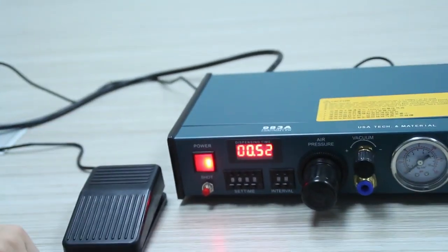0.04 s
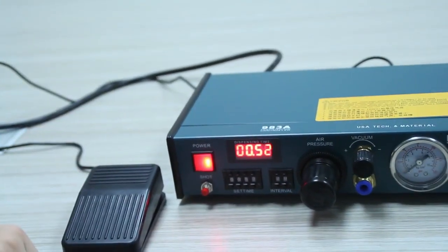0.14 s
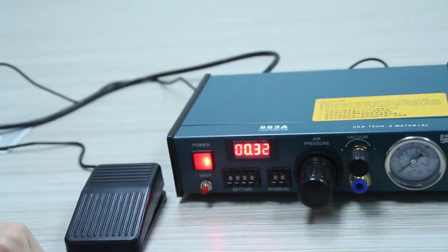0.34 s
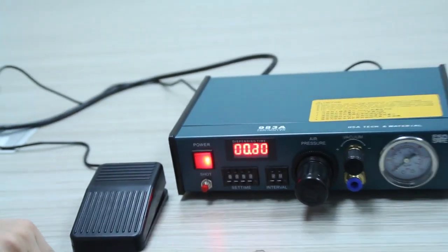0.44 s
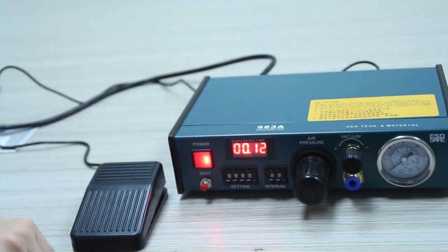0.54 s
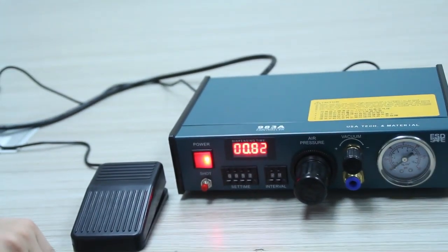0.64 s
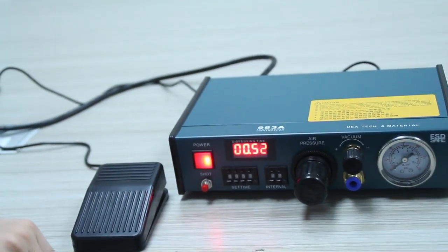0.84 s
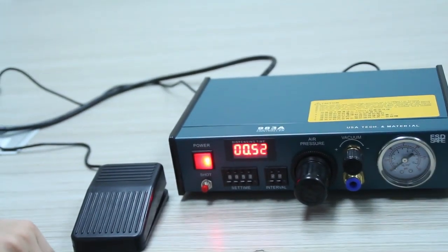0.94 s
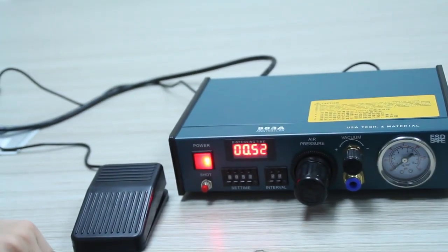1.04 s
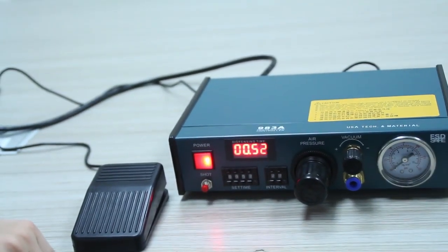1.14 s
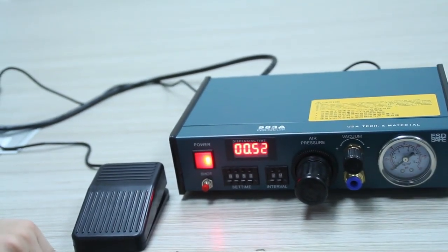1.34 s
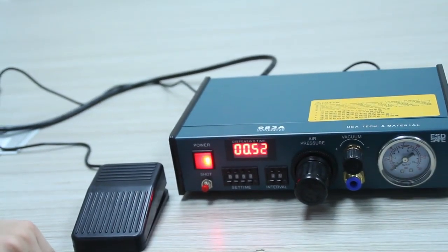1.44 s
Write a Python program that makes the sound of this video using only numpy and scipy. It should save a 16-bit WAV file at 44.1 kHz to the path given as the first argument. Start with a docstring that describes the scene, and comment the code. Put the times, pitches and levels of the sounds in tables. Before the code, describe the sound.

A pneumatic dispenser valve clicks open and shut once, with a short puff of air.

```python
"""Air valve in a metal box

A solenoid valve snaps open with a pop and a rush of air, then drops shut half a second later
with ticks and a rattle. Each stroke of its plunger makes the sheet-metal box boom in close
tones that beat against each other. A quiet room echoes and hums behind."""
import sys
import numpy as np
from scipy import signal
from scipy.io import wavfile
from scipy.ndimage import uniform_filter1d

SR = 44100
rng = np.random.default_rng(int(sys.argv[2]) if len(sys.argv) > 2 else 0)


def put_to_file(sound):
    """Save the sound as 16-bit audio at rate SR, in the file named by the first command-line argument."""
    columns = np.atleast_2d(sound).T  # one column per channel
    safe = np.clip(columns, -1, 1)
    whole_steps = np.round(safe * 32767)
    wavfile.write(sys.argv[1], SR, whole_steps.astype(np.int16))


N = 66150

# A fade is the time to drop 60 dB. A positive tilt favours the high tones.
# plunger strokes that shake the box (time [s], level [dB], tilt [dB/octave])
STROKES = [(.2111, -17.8, -1.6), (.7447, -16.5, 1.6)]
# ringing tones of the box panels (pitch [Hz], level [dB], fade [s], sign [+1 or -1])
BOX_TONES = [(253.4, -10, .13, 1), (288.5, -4.7, .21, 1), (302.4, -14, .8, 1), (319.7, 0, .31, 1),
             (329.3, -2.1, .3, -1), (340.2, -9.6, .61, 1), (360.1, -2.8, .33, -1), (366, -8.4, .53, 1),
             (386.7, -4.5, .42, -1)]
# the plunger hits its end stop on opening (time [s], level [dB], tilt [dB/octave])
LANDINGS = [(.2120, -26.5, 1.5)]
# tones of the end stop (pitch [Hz], level [dB], fade [s])
STOP_TONES = [(520, -8.5, .04), (610, -18, .04), (774, -8.5, 0.035), (900, -11.5, .04), (1064, -2, .06),
              (1190, -6.5, 0.0399), (1985, 1, .02), (2120, -3, .02), (2360, -7.5, 0.032), (2690, 2.5, .021),
              (3610, -8.5, 0.026), (4063, -3.5, 0.0406), (4650, -15.5, .015), (5900, -8.5, .03),
              (5760, -13.5, 0.0189), (8400, -9, .02), (9120, -17, .016)]
# ticks as the valve closes (time [s], level [dB], tilt [dB/octave])
TICKS = [(.7382, -26, 0), (.7422, -36.5, -9.5), (.7452, -50, -9.5)]
# tones of the valve body (pitch [Hz], level [dB], fade [s])
VALVE_TONES = [(690, -19, .04), (975, -20, .04), (1250, -23, .04), (1630, -12, .08), (1905, -12, .04),
               (2470, -11, .06), (2780, -8, .03), (2960, -16, .06), (3180, -11, .03), (3412, -11, .17),
               (3450, -2, .02), (4035, -14, .05), (4400, -16, .02), (4900, -19, .03), (8300, -16, .03),
               (8900, -20, .03)]
# air snaps on opening (time [s], level [dB], fade [s], tilt [dB/octave])
SNAPS = [(0.2096, -26, 0.03, 1), (0.216, -40, 0.059, -1.5), (0.224, -27, 0.089, -1)]
# faint puffs while the valve is open (time [s], level [dB], centre [Hz], width [Hz])
PUFFS = [(0.406, -52, 1190, 400), (0.492, -53, 3000, 2000)]
# the colour of each noise, from bass to treble (frequency [Hz], relative level [dB])
SNAP_COLOUR = [(290, -35.5), (500, -8.5), (1100, 0.5), (1500, -10), (2060, 8), (2500, -1), (2750, 4.5),
               (2950, -14), (3450, 6.5), (3750, -4), (4140, 7.5), (5000, 1.5), (5700, 9), (6200, -0.5),
               (6550, -23.5), (7600, -13), (8400, 12.5), (9360, 18.5), (10500, -71), (13600, -75.5),
               (22000, -120)]
RUSH_COLOUR = [(290, -26.5), (500, -0.5), (680, -2), (1000, 2), (2400, -1.5), (2900, -10.5), (3210, 4),
               (7260, -1.5), (9010, 4), (9850, -44.5), (10500, -74.5), (13600, -104), (22000, -120)]
RATTLE_COLOUR = [(350, -31.5), (600, -3.5), (1000, -6), (1660, -6), (2110, -28.5), (2490, -15), (3330, 5),
                 (4000, -4.5), (4400, -22), (5060, -14.5), (5430, -46), (6580, -34), (8500, -6.5),
                 (8990, -20), (10500, -88.5), (13600, -117), (22000, -120)]
HUM_COLOUR = [(12, -60), (20, -42.5), (38, -8), (63, -23), (85, -4.5), (129, -11.5), (154, -1), (229, -4),
              (275, -5.5), (313, -3.5), (348, -14.5), (407, -9), (573, -13.5), (1020, -14.5), (1220, -17.5),
              (1510, -16.5), (2200, -22.5), (4000, -25.5), (7280, -32.5), (10500, -74), (13600, -107),
              (22000, -120)]
# how alike the left and right sides are (frequency [Hz], likeness [-1 to 1])
VALVE_LIKENESS = [(60, -0.12), (220, 0.84), (780, 0.855), (2810, 0.83), (10100, -0.24)]
HUM_LIKENESS = [(60, -0.15), (120, 0.12), (260, 0.78), (540, 0.54), (1120, 0.52), (2340, 0.26),
                (4870, -0.17), (10100, -0.099)]
# which side is louder (frequency [Hz], left minus right [dB])
VALVE_PAN = [(60, -17.5), (140, -19.5), (330, 0), (780, -6.5), (1830, -6.5), (4310, -3.5), (10100, -0.5)]
HUM_PAN = [(60, 4.5), (140, -8.5), (330, -7.5), (780, -7), (1830, -4), (4310, -1), (10100, 0)]
# how long the room echoes (frequency [Hz], fade [s])
ROOM_FADE = [(500, 0.98), (2000, .45), (5000, 0.55), (10000, 0.094)]

BOX_MID_HZ, VALVE_MID_HZ = 330, 3000  # a tilt leaves the level unchanged here


def box_boom(rise_s=.002006, left_db=-11):
    """Every plunger stroke rings the same tones in the box panels, louder on the right."""
    out = np.zeros(N)
    for start, level_db, tilt_db in STROKES:
        t, _ = since(start)
        rise = np.minimum(t / rise_s, 1)
        for hz, tone_db, fade_s, sign in BOX_TONES:
            db = level_db + tone_db + tilt_db * np.log2(hz / BOX_MID_HZ)
            out += sign * rise * amp(db - 60 * t / fade_s) * np.sin(2 * np.pi * hz * t)
    return cut_bass(out) * amp([[left_db], [0]])


def air_snaps():
    """Air escapes in very short bursts as the valve opens."""
    out = np.zeros((2, N))
    for start, db, fade_s, tilt_db in SNAPS:
        t, on = since(start)
        colour = [(hz, level + tilt_db * np.log2(hz / VALVE_MID_HZ)) for hz, level in SNAP_COLOUR]
        out += on * amp(db - 60 * t / fade_s) * noise(colour)
    return out


def seal_pop(start=.2108, db=-11, hz=6000):
    """One cycle of pressure as the seal breaks."""
    cycles = since(start)[0] * hz
    pop = amp(db) * np.sin(2 * np.pi * cycles) * (cycles < 1)
    return pop * amp(np.array([[.5], [-.5]]) * read(VALVE_PAN, hz))


def struck_metal(blows, tones, wobble=.3, wobble_s=.006):
    """A push and a millisecond of chatter ring a metal part; loose contact makes each tone waver."""
    chatter = rng.standard_normal((len(blows), 2, 40)) * np.hanning(40)
    t = np.arange(SR // 3) / SR
    out = np.zeros((2, N))
    hz, tone_db, fade_s = np.transpose(tones)[:, :, None]
    for (start, level_db, tilt_db), (shared, right_only) in zip(blows, chatter):
        db = level_db + tone_db + tilt_db * np.log2(hz / VALVE_MID_HZ)
        waves = amp(db - 60 * t / fade_s) * np.sin(2 * np.pi * hz * t)
        waver = drift(rng.standard_normal(waves.shape), round(wobble_s * SR))
        waves *= 1 + wobble * waver * np.minimum(t / wobble_s, 1)
        ring = np.array([(waves * amp(side * read(VALVE_PAN, hz) / 2)).sum(0) for side in (1, -1)])
        force = .05 * np.array([shared, shared + 1.1 * right_only])
        force[:, 0] += .8  # the sharp push
        hit = signal.fftconvolve(force, ring, axes=1)[:, :len(t)]
        out[:, round(start * SR):][:, :len(t)] += hit
    return cut_bass(out)


def air_rush(start=.212, rise_s=.00069, db=-35, fade_s=.43, seep_db=-41.5, seep_fade_s=.47):
    """Air streams in and dies away as the pressure evens out; the last of it seeps in."""
    t, _ = since(start)
    flow = amp(db - 60 * t / fade_s) + amp(seep_db - 60 * t / seep_fade_s)
    return np.minimum(t / rise_s, 1) * flow * noise(RUSH_COLOUR, patchy_db=1.)


def rattle(start=.742, db=-38, fade_s=.27):
    """Loose parts rattle on after closing, heard as a fading noise."""
    t, on = since(start)
    return on * amp(db - 60 * t / fade_s) * noise(RATTLE_COLOUR, patchy_db=-1.5)


def puffs(peak_s=.0125):
    """Soft, narrow bursts of noise swell and fade."""
    out = np.zeros((2, N))
    for start, db, hz, width in PUFFS:
        t, _ = since(start)
        colour = [(hz - width, -30), (hz - width / 2, 0), (hz + width / 2, 0), (hz + width, -30)]
        out += amp(db) * t / peak_s * np.exp(1 - t / peak_s) * noise(colour)
    return out


def room_echo(sound):
    """Many small reflections blur into a tail in which the bass lasts longest."""
    echoes = np.zeros((2, SR // 2))
    slots = np.arange(300, SR // 2 - 20, 20)  # one reflection in every 20 samples
    delays = slots + rng.integers(0, 20, (2, len(slots)))
    np.put_along_axis(echoes, delays, rng.choice([-1., 1.], delays.shape), 1)
    hz, t, bands = signal.stft(echoes, SR, nperseg=256)
    bands *= amp(-60 * t / read(ROOM_FADE, hz)[:, None])
    tail = signal.istft(bands, SR, nperseg=256)[1]
    return signal.fftconvolve(sound, tail / np.linalg.norm(tail[0]), axes=1)[:, :N]


def room_hum(db=-45.5):
    """The quiet room gives a low, nearly steady noise."""
    return amp(db) * noise(HUM_COLOUR, HUM_LIKENESS, HUM_PAN, patchy_db=1.5, swell_db=-.1, size=4096)


def noise(colour, likeness=VALVE_LIKENESS, pan=VALVE_PAN, patchy_db=0., swell_db=0., size=1024):
    """Coloured stereo noise whose level can drift in patches of pitch or swell as a whole."""
    frames = N // (size // 4) + 5
    hz = np.fft.rfftfreq(size, 1 / SR)
    a, b, c, d, patches = rng.standard_normal((frames, len(hz), 5)).T
    patches = drift(uniform_filter1d(patches, size // 100, axis=0), 8192 // size)
    swell = drift(rng.standard_normal(frames), 12288 // size)
    alike = np.clip(read(likeness, hz), -1, 1)[:, None]
    left = a + 1j * b
    right = alike * left + np.sqrt(1 - alike ** 2) * (c + 1j * d)
    lean = amp(read(pan, hz) / 2)[:, None]
    bands = np.array([left * lean, right / lean])
    bands *= amp(read(colour, hz)[:, None] + patchy_db * patches + swell_db * swell)
    out = signal.istft(bands, nperseg=size, noverlap=size - size // 4)[1][:, :N]
    return out / np.sqrt(np.mean(out.mean(0) ** 2))


def cut_bass(sound, hz=190):
    """Small objects send out no deep bass."""
    return signal.sosfilt(signal.butter(2, hz, "high", fs=SR, output="sos"), sound)


def drift(values, span):
    """Smooths random values into a slow wander with a typical size of 1."""
    smooth = uniform_filter1d(values, span)
    return smooth / np.sqrt(np.mean(smooth ** 2) + 1e-20)


def amp(db):
    """Turns decibels into a multiplier."""
    return 10 ** (np.asarray(db) / 20)


def read(table, hz):
    """Reads between the rows of a table along a pitch scale."""
    row_hz, values = np.transpose(table)
    return np.interp(np.log(hz + 1), np.log(row_hz + 1), values)


def since(start):
    """Seconds since the start, and a switch that is on from then."""
    t = np.arange(N) / SR - start
    return np.maximum(t, 0), t >= 0


def scene():
    """Box, valve and air, with the room's echo and hum behind."""
    boom = box_boom()
    clicks = air_snaps() + seal_pop()
    clicks += struck_metal(LANDINGS, STOP_TONES) + struck_metal(TICKS, VALVE_TONES)
    hum = room_hum()
    echo = room_echo(amp(-6) * clicks + amp(-20) * boom)
    return boom + clicks + air_rush() + rattle() + puffs() + echo + hum


def record(dry, dull_hz=9350, top_hz=10700):
    """The highest treble falls away steeply, then is cut off."""
    dull = signal.sosfilt(signal.butter(14, dull_hz, fs=SR, output="sos"), dry)
    cutoff = signal.firwin(511, top_hz, window=("kaiser", 9), fs=SR)
    return signal.oaconvolve(dull, cutoff[None], "same")


dry = scene()
out = record(dry)
put_to_file(out)
```